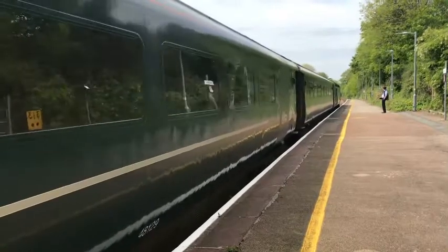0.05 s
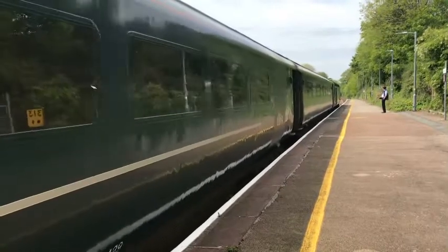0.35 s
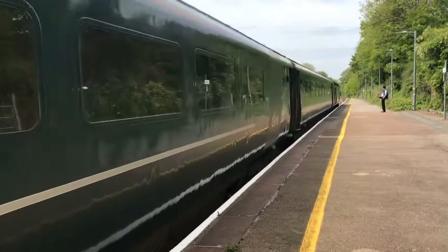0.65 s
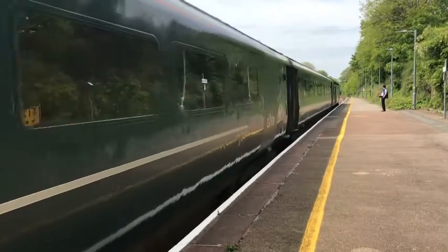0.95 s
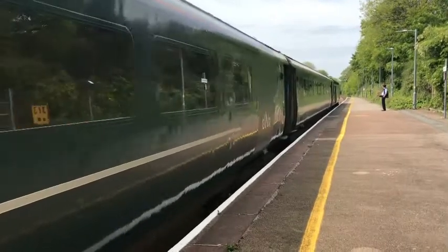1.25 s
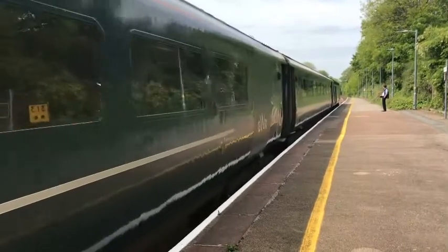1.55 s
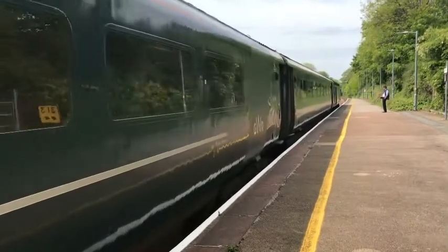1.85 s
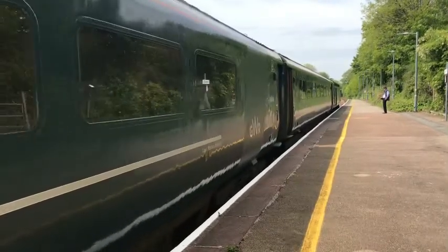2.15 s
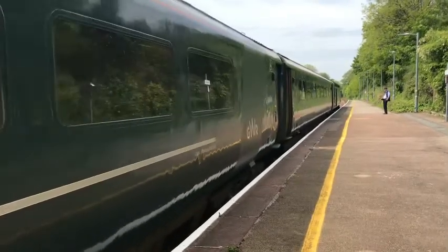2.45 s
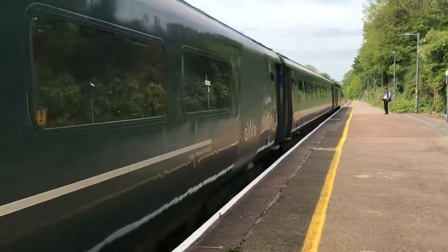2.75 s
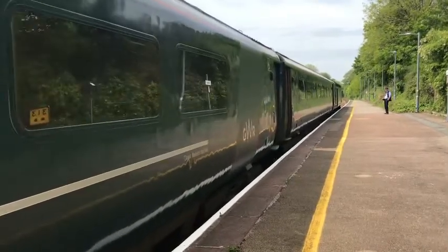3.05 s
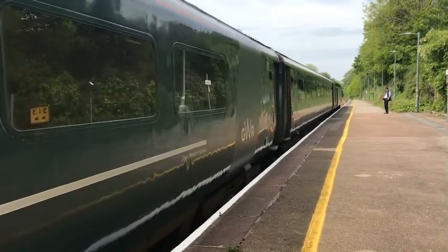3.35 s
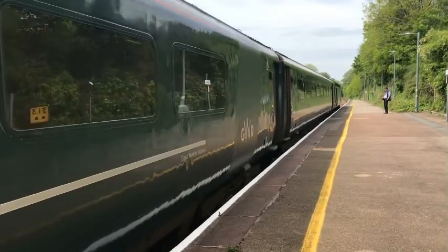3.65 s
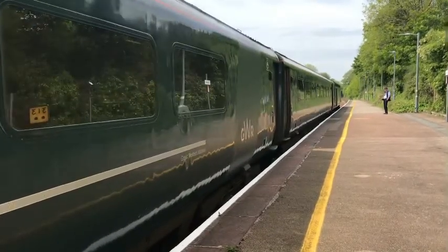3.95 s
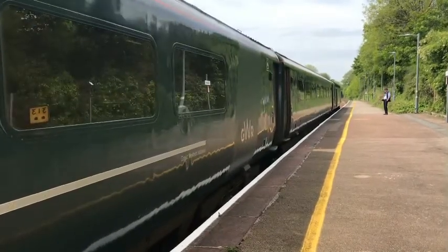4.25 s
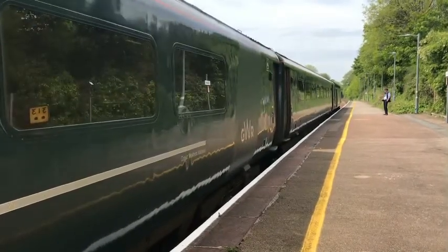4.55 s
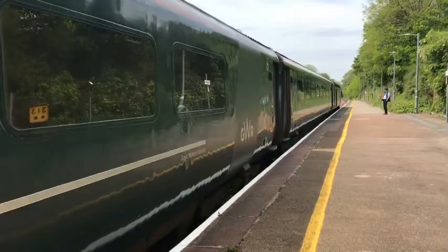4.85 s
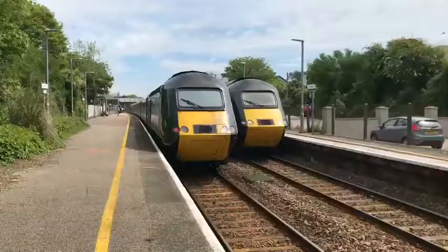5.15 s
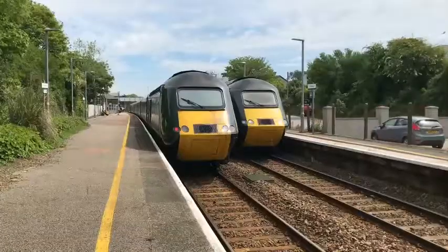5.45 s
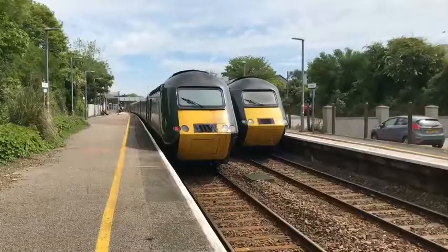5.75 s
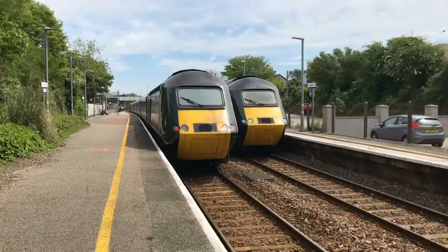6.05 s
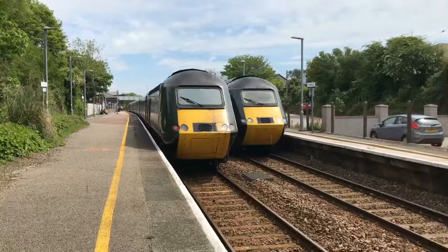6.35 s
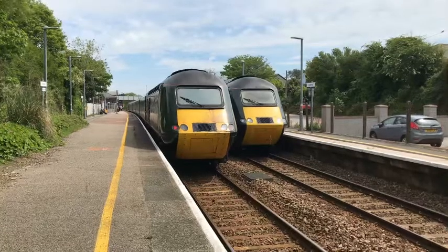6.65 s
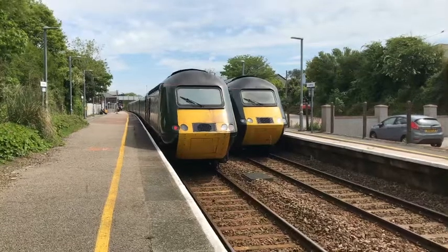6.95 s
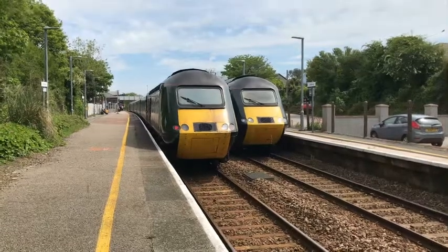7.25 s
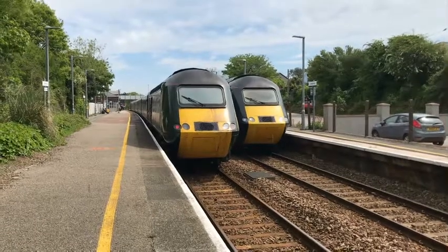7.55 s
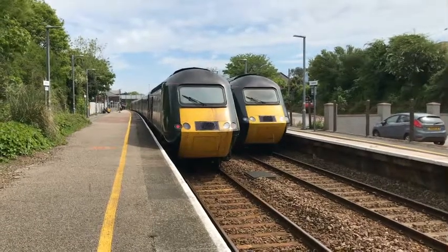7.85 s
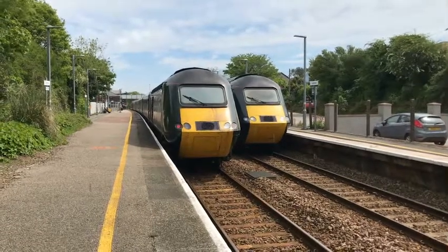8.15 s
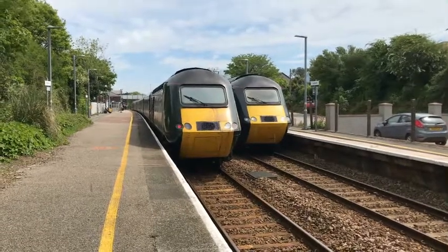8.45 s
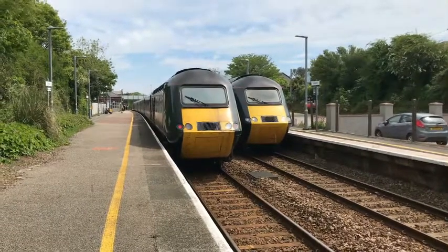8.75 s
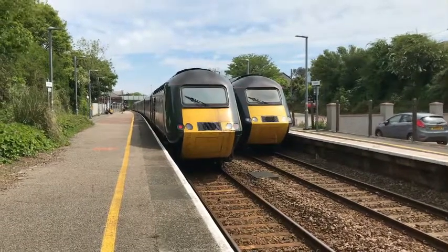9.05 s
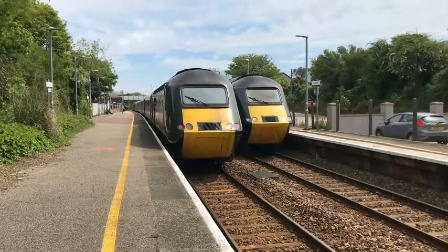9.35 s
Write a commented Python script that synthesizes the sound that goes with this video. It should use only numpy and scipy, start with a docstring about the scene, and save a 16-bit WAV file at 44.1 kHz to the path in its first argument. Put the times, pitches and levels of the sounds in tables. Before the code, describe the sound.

A passenger train slows to a halt close beside the platform, its coaches rumbling and humming under a burst of hissing air and thin brake squeaks. After a brief groan it stands, still humming. Suddenly the deep throb of two idling diesel power cars takes over, their engines rattling steadily while fans blow and a whine wavers above them.

```python
"""Beside a station platform, a diesel passenger train creeps to a halt. Its coaches rumble and hum,
a brake valve lets out hissing air, and the brake pads squeal thinly on their discs.
Then the scene jumps to two power cars whose big diesels idle: the firing cylinders make the
exhaust throb and the engine clatter, while cooling air rushes and a whine wavers."""
import sys
import numpy as np
from scipy import signal
from scipy.fft import rfft, irfft, next_fast_len
from scipy.io import wavfile
from scipy.ndimage import uniform_filter1d, map_coordinates

SR = 44100
rng = np.random.default_rng(int(sys.argv[2]) if len(sys.argv) > 2 else 0)


def master(y):
    """Save y as 16-bit WAV."""
    cut = np.clip(np.atleast_2d(y).T, -1, 1)
    pcm = np.round(cut * 32767)  # scale
    wavfile.write(sys.argv[1], SR, pcm.astype(np.int16))


N = 414540
TIME = np.arange(N) / SR


def amp(db):
    """Turn decibels into a gain."""
    return 10 ** (np.asarray(db) / 20)


def unit(x):
    """Scale to an average (rms) strength of 1."""
    return x / np.sqrt(np.mean(x ** 2) + 1e-20)


def curves(rows):
    """Join a table's points: one curve for each column after the time."""
    times, *columns = np.transpose(rows)
    return [np.interp(TIME, times, column) for column in columns]


def wobble(rate):
    """A smooth curve through `rate` random points a second."""
    return map_coordinates(rng.standard_normal(int(N * rate / SR) + 4), [TIME * rate])


def filtered(x, response):
    """Scale each frequency in x by the gain `response` gives it."""
    size = next_fast_len(N + SR // 2)
    return irfft(rfft(x, size) * response(np.fft.rfftfreq(size, 1 / SR)), size)[:N]


def coloured(x, spectrum):
    """Shape x with (f/Hz, level/dB) points; the result has strength 1."""
    f, db = np.transpose(spectrum)
    return unit(filtered(x, lambda hz: amp(np.interp(np.log(hz + 1), np.log(f), db, left=-120))))


def resonated(x, modes):
    """Make x ring at (f/Hz, width/Hz, level/dB) peaks; the result has strength 1."""
    def response(f):
        return sum((-1) ** k * amp(db) * 1j * f * width / (hz * hz - f * f + 1j * f * width)
                   for k, (hz, width, db) in enumerate(modes))
    return unit(filtered(x, response))


def turbulence(patchy_db):
    """White noise with drifting louder and softer patches."""
    spectra = signal.stft(rng.standard_normal(N), nperseg=512)[2]
    patches = uniform_filter1d(rng.standard_normal(spectra.shape), size=5, axis=0)
    patches = unit(uniform_filter1d(patches, size=16, axis=1))
    return unit(signal.istft(spectra * amp(patchy_db * patches), nperseg=512)[1][:N])


def tone(hz):
    """A pure tone that follows a pitch curve."""
    return np.sqrt(2) * np.sin(2 * np.pi * (np.cumsum(hz) / SR + rng.random()))


def hum(notes, drift_hz, flutter_db):
    """Machine notes that waver a little in pitch and level."""
    return sum(amp(db - fade * TIME + flutter_db * wobble(5)) * tone(hz + drift_hz * wobble(4))
               for hz, db, fade in notes)


def squeal(hz, scatter_hz, flutter_db):
    """A vibration that feeds itself, unsteady in pitch and strength."""
    return amp(flutter_db * wobble(30)) * tone(hz + scatter_hz * wobble(250))


def swell(start, rise, hold, fall, db):
    """A gain that rises, holds and falls in rounded slopes."""
    outside = np.maximum((start + rise - TIME) / rise, 0)
    outside += np.maximum((TIME - start - rise - hold) / fall, 0)
    return amp(db - 20 * outside ** 2)


def dying_away(start, rise, db, fade_db_per_s):
    """A gain that rises quickly, then fades."""
    age = np.maximum(TIME - start, 0)
    return np.minimum(age / rise, 1) * amp(db - fade_db_per_s * np.maximum(age - rise, 0))


def echoed(x, decay_s):
    """Sound bounces between the car bodies and platform walls."""
    t = np.arange(SR // 2) / SR
    echoes = rng.standard_normal(len(t)) * amp(-60 * t / decay_s)
    return unit(signal.fftconvolve(x, echoes)[:N])


# Tone colour of the coaches' rumble and of their rushing air: f/Hz, level/dB
COACH_RUMBLE = [(13, -51), (22, -19), (42, -3.5), (54, -0.5), (75, 0), (103, 0), (141, 0), (162, -7),
                (219, -8), (253, -11), (304, -9), (333, -14.5), (385, -19), (500, -38), (650, -38),
                (1100, -120)]
COACH_RUSH = [(240, -14), (400, -4), (587, -1), (739, 0.5), (823, -3), (903, -2.5), (1020, -2.5),
              (1270, -3.5), (1720, -10.5), (3380, -17.5), (4890, -24), (5360, -23.5), (5610, -22),
              (8240, -33.5), (15700, -41)]
# Where the air vents ring: f/Hz, width/Hz, level/dB
VENT_PEAKS = [(5950, 420, -4), (7070, 530, -5.5), (8580, 750, -8), (12400, 460, -16)]
# Generator and fan notes: f/Hz, starting level/dB, fade/(dB/s)
COACH_HUM = [(51.2, -40.5, 4), (100.6, -39, .5), (229, -41.5, 7.5), (302.6, -43.5, 2.5), (387.6, -54, 2.5)]

def coaches(speed):
    """Rumble and rushing air ease as the train slows; machines hum under the floor."""
    rumble = amp(-33.5 + 2.5 * speed) * coloured(turbulence(1), COACH_RUMBLE)
    rush = amp(-45.5 + 2.5 * speed) * coloured(turbulence(0.5), COACH_RUSH)
    vents = amp(-63.5) * resonated(turbulence(0.5), VENT_PEAKS)
    return rumble + rush + vents + hum(COACH_HUM, drift_hz=0.64, flutter_db=1.5)


# Where the wheels ring: f/Hz, width/Hz, level/dB
WHEEL_PEAKS = [(400, 91, 0), (573, 200, 2)]
# Groan of the wheel frames: t/s, rise/s, hold/s, fall/s, level/dB
FRAME_GROAN = [(2.75, 0.5, .25, 0.17, -37.5)]

def wheels(speed):
    """The wheels' roar dies with the speed, and their frames groan just before the stop."""
    rolling = coloured(turbulence(-2), [(200, -10), (350, 0), (700, 0), (2000, -26)])
    roar = amp(-47) * speed ** 1.9 * resonated(rolling, WHEEL_PEAKS)
    return roar + swell(*FRAME_GROAN[0]) * squeal(131.5, scatter_hz=5.56, flutter_db=6)


# Tone colour of the rubbing pads: f/Hz, level/dB
PAD_GRIND = [(1500, -14), (2800, 2), (4200, -1), (7000, -27)]
# One squeal each time the pads catch: t/s, length/s, f/Hz, glide/Hz, level/dB
PAD_SQUEALS = [(.33, .06, 8470, -30, -68), (.48, .12, 8440, -40, -67), (.68, .07, 8660, 30, -67),
               (1.04, .14, 8620, -80, -63), (1.77, .18, 8620, -200, -64), (1.96, 0.11, 8500, 60, -64),
               (2.16, .24, 8500, 190, -64), (2.42, .22, 8720, 90, -69), (2.667, .15, 8660, 40, -58.5),
               (2.82, .17, 8810, 130, -66)]

def brake_pads(speed):
    """Pads grind on the discs, sing in short glides and squeak at the last slip."""
    grind = amp(-56.5) * speed ** 2.5 * coloured(turbulence(3.5), PAD_GRIND)
    squeals, edge_s = np.zeros(N), 0.029
    for start, length, hz, glide_hz, db in PAD_SQUEALS:
        gain = swell(start - edge_s / 2, edge_s, length - edge_s, edge_s, db)
        pitch = hz + glide_hz * np.clip((TIME - start) / length, 0, 1)
        squeals += gain * squeal(pitch, scatter_hz=35, flutter_db=2.5)
    slip = dying_away(start=3.76, rise=0.025, db=-56, fade_db_per_s=105)
    return grind + squeals + slip * squeal(5172, scatter_hz=7, flutter_db=4)


# Tone colour of the air jet's thin hiss and of its fuller core: f/Hz, level/dB
THIN_COLOUR = [(4500, -27), (6000, -9), (6600, 3.5), (7700, -3), (8600, 3), (9600, 1), (10300, -5.5),
               (11800, -2.5), (12700, 0), (13600, -2), (15600, -1.5)]
CORE_COLOUR = [(1500, -13), (2600, -8), (3600, 3), (4300, 2.5), (4900, -4), (5400, -1), (7000, -0.5),
               (10000, -14), (15000, -28)]
# When each of the two swells: t/s, rise/s, hold/s, fall/s, level/dB
THIN_SWELLS = [(.86, 0.084, .1, .1, -55.5), (1.015, 0.11, 0.22, 0.49, -44.5)]
CORE_SWELL = [(.78, 0.44, 0.11, 0.39, -51)]

def brake_air():
    """A valve opens a crack, then fully; its hiss thins as the pressure falls, with a faint ring."""
    thin = sum(swell(*stage) for stage in THIN_SWELLS) * coloured(turbulence(1.5), THIN_COLOUR)
    nozzle_whistle = amp(-7.5) * resonated(turbulence(1), [(5380, 70, 0), (6660, 130, -1)])
    core = swell(*CORE_SWELL[0]) * (coloured(turbulence(2.5), CORE_COLOUR) + nozzle_whistle)
    ring_gain = dying_away(start=1.13, rise=0.04, db=-52, fade_db_per_s=22)
    return thin + core + ring_gain * squeal(1757, scatter_hz=24, flutter_db=3)


# The second engine's notes: f/Hz, level/dB at time zero, fade/(dB/s)
SECOND_ENGINE_NOTES = [(100.75, -37.5, -0.5), (179.1, -41, 0), (225.6, -46, 0), (267.4, -45, 0.5)]

def second_engine():
    """The other power car idles with a steady hum."""
    return hum(SECOND_ENGINE_NOTES, drift_hz=0.97, flutter_db=1)


# Path of the whine's lowest note: t/s, f/Hz, level/dB
WHINE_PATH = [(5.05, 450, -57), (5.7, 444.6, -54), (6.2, 441.6, -45.5), (8.7, 438.2, -46.5),
              (9.4, 451, -50.5)]
# Its notes, compared with the lowest: pitch ratio, level/dB
WHINE_NOTES = [(1, 0), (1.352, -5), (1.562, -3.5), (2.64, -8)]

def whine():
    """The engine's helper machines whine on several wavering notes."""
    hz, level_db = curves(WHINE_PATH)
    return sum(amp(level_db + db + 1.8 * wobble(6.3)) * tone(ratio * (hz + 2.593 * wobble(16)))
               for ratio, db in WHINE_NOTES)


# Tone colour of the cooling air: f/Hz, level/dB
FAN_COLOUR = [(500, -27), (850, -2.5), (996, -1), (1170, -2.5), (1680, -9.5), (1860, -10.5), (2640, -16.5),
              (3210, -17.5), (4870, -27), (5920, -25.5), (7640, -34.5), (9870, -38.5), (15700, -71)]

def cooling_fans(knocks, draw_db):
    """Fans push rushing air, with a trace of the engine's knocking in it."""
    air = turbulence(1) + 0.16 * echoed(knocks, decay_s=0.1)
    return amp(-40 + 0.26 * draw_db) * coloured(air, FAN_COLOUR)


# Where the air intake and its grille ring: f/Hz, width/Hz, level/dB
INTAKE_PEAKS = [(1103, 170, -2.5), (1254, 184, -1.5)]
GRILLE_PEAKS = [(3330, 580, 0), (6000, 700, -10)]

def air_intake(draw_db):
    """The intake whooshes and its grille hisses as more air is drawn in."""
    whoosh = coloured(turbulence(2.2), [(500, -23), (1000, 0), (3600, -8), (8000, -10)])
    hiss = coloured(turbulence(1), [(1500, -12), (3300, 0.5), (6000, -3), (12000, -18)])
    return (amp(-48 + 1.34 * draw_db) * resonated(whoosh, INTAKE_PEAKS)
            + amp(-62 + 1.55 * draw_db) * resonated(hiss, GRILLE_PEAKS))


CYLINDERS = 12  # each fires once per engine cycle

def engine_wave(cycle, multiple):
    """A pure wave that repeats `multiple` times per engine cycle."""
    return np.sqrt(2) * np.cos(2 * np.pi * multiple * cycle)


def uneven_firings(cycle, uneven_db, scatter_db):
    """Cylinders fire unequally: each knock is how far one firing is from the average."""
    fired = np.flatnonzero(np.diff(np.floor(cycle * CYLINDERS)))
    cylinder_db = uneven_db * rng.permutation(np.linspace(-1, 1, CYLINDERS))
    strength = amp(np.resize(cylinder_db, len(fired)) + scatter_db * rng.standard_normal(len(fired)))
    knocks = np.zeros(N)
    knocks[fired] = strength - strength.mean()
    return knocks


# Where the engine block and body panels ring: f/Hz, width/Hz, level/dB
BLOCK_PEAKS = [(405.4, 25, -3.5), (539, 72, -3.5), (597, 35, 0.5), (671, 69, -1.5), (790, 122, -4.5),
               (890, 160, -10)]

def clatter(cycle, knocks, draw_db):
    """Valves and fuel injectors rattle in step with the turning engine."""
    beat = 1 + sum(depth * engine_wave(cycle, per_firing * CYLINDERS)
                   for per_firing, depth in [(1, 0.041), (2, 0.057), (0.25, 0.037)])
    rattle = echoed(knocks, decay_s=0.29) + 1.44 * beat * turbulence(1.5)
    return amp(-38.5 + 0.25 * draw_db) * resonated(rattle, BLOCK_PEAKS)


# Strength of the firing note, before the sag: t/s, level/dB
FIRING_NOTE = [(5.05, -25), (6.3, -31.5), (7.0, -26.5), (8.5, -25.5), (9.0, -22), (9.4, -26)]
# Throb of the uneven cylinders: beats per engine cycle, relative level/dB
THROB_NOTES = [(6, -29), (7, -28), (8, 3), (9, -10), (10, -15)]
# Tone colour of the exhaust pipe: f/Hz, level/dB
PIPE_COLOUR = [(50, -30), (85, -8.5), (130, -12), (172, -10), (243, -16.5), (268, -18.5), (280, -15.5),
               (303, -21.5), (338, -22), (370, -29.5), (400, -26.5), (520, -30), (880, -120)]

def exhaust(cycle, knocks):
    """Firings make a deep, throbbing note; knocks and swirling gas make the pipe ring."""
    note_db, = curves(FIRING_NOTE)
    sag_db = -13 * np.exp(-((TIME - 6.76) / 0.1) ** 2)  # the bass dips once as the speed settles
    note = amp(note_db) * engine_wave(cycle, CYLINDERS)
    throb = amp(-31) * sum(amp(db + 1.1 * wobble(8.3)) * engine_wave(cycle, k) for k, db in THROB_NOTES)
    gas = echoed(knocks, decay_s=0.22) + 1.12 * turbulence(0.5)
    pipe = amp(-31) * coloured(gas, PIPE_COLOUR)
    boom_colour = [(20, -25), (36, -3), (55, 5), (85, -12), (120, 8), (250, -78)]
    boom = amp(-37) * coloured(turbulence(2.5), boom_colour)
    return amp(sag_db) * (note + throb) + amp(0.24 * sag_db) * (pipe + boom)


# How often the near engine fires: t/s, f/Hz
FIRING_RATE = [(5.05, 77), (6.4, 74.2), (6.8, 76.3), (8.7, 76.1), (9.4, 76)]
# How hard it draws air, compared with quiet idling: t/s, level/dB
AIR_DRAW = [(5.05, 5.5), (5.3, 4.5), (5.7, 0.5), (6.8, 4), (7.2, -1), (8.7, 1), (9.15, 7.5), (9.4, 6)]

def near_engine():
    """A big diesel idles: its firings drive the exhaust and clatter while it sucks in air."""
    firing_hz, = curves(FIRING_RATE)
    draw_db, = curves(AIR_DRAW)
    cycle = np.cumsum(firing_hz) / SR / CYLINDERS
    cycle -= np.interp(5.052, TIME, cycle)  # a cycle begins at 5.052 s
    knocks = uneven_firings(cycle, uneven_db=4, scatter_db=0.14)
    air = cooling_fans(knocks, draw_db) + air_intake(draw_db)
    return whine() + air + clatter(cycle, knocks, draw_db) + exhaust(cycle, knocks)


def scene():
    """The arriving coaches give way at once to the idling power cars."""
    stop_s, jump_s = 3.4, 5.05
    speed = np.maximum(1 - TIME / stop_s, 0)  # falls evenly from 1 to 0
    arriving = coaches(speed) + wheels(speed) + brake_pads(speed) + brake_air()
    idling = second_engine() + near_engine()
    return np.where(TIME < jump_s, arriving, idling)[None]


def record(dry):
    """Remove the very highest treble."""
    return np.array([filtered(channel, lambda hz: hz < 15750) for channel in dry])


dry = scene()
out = record(dry)
master(out)
```